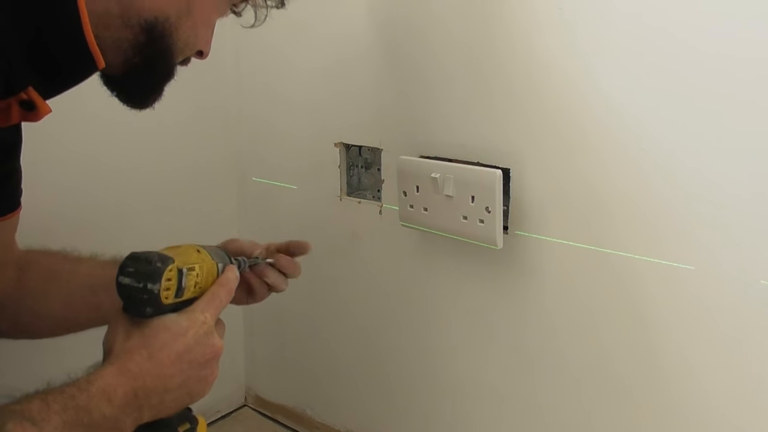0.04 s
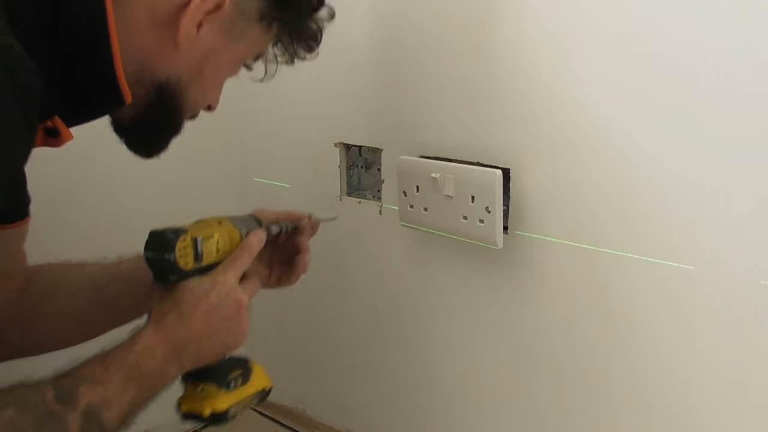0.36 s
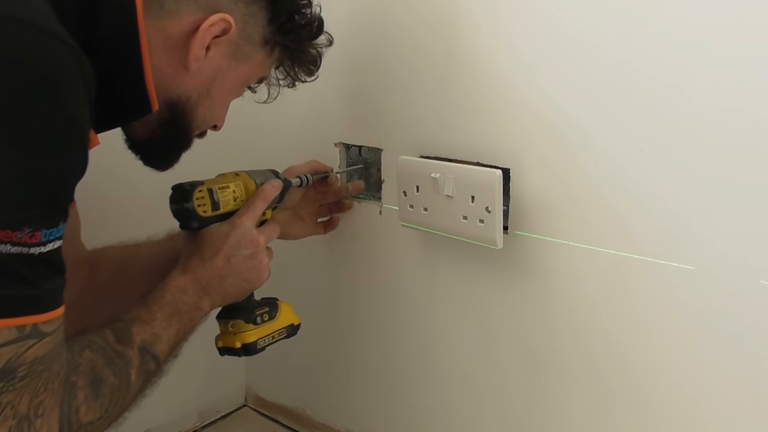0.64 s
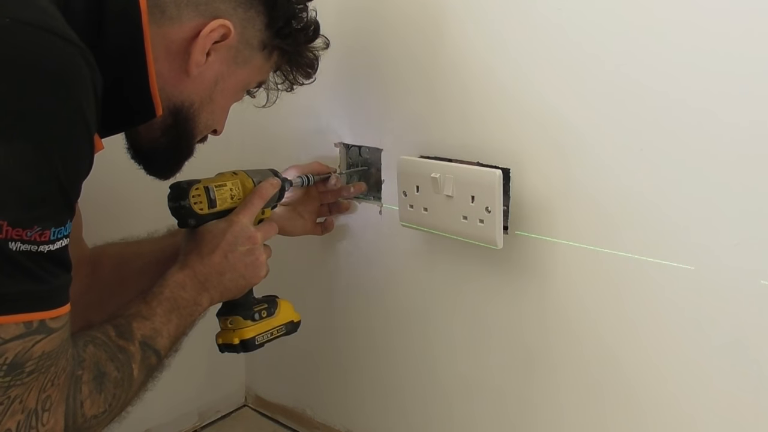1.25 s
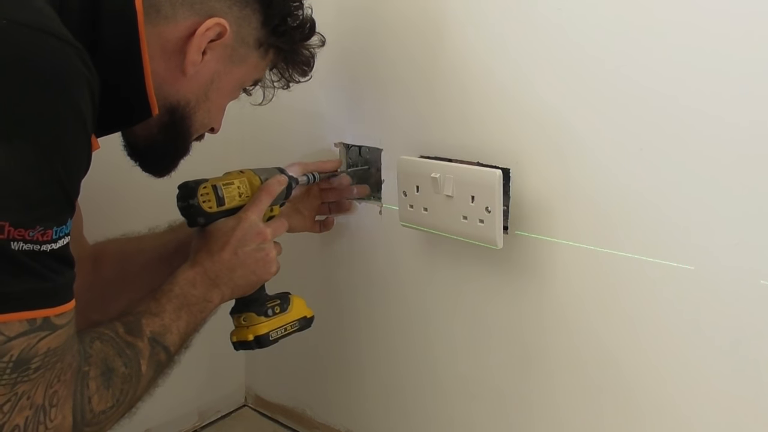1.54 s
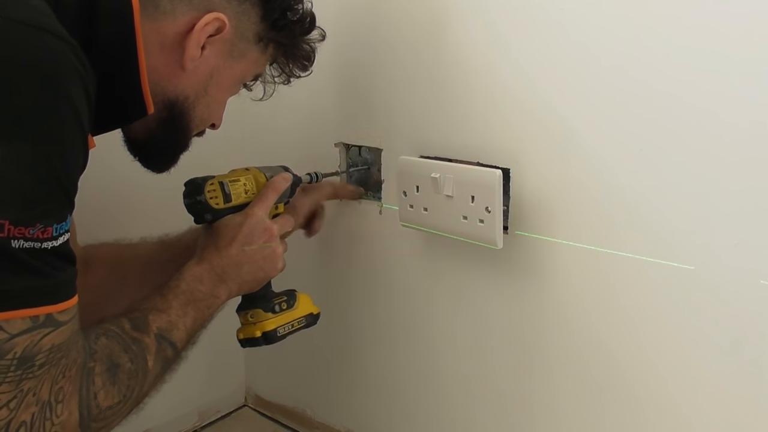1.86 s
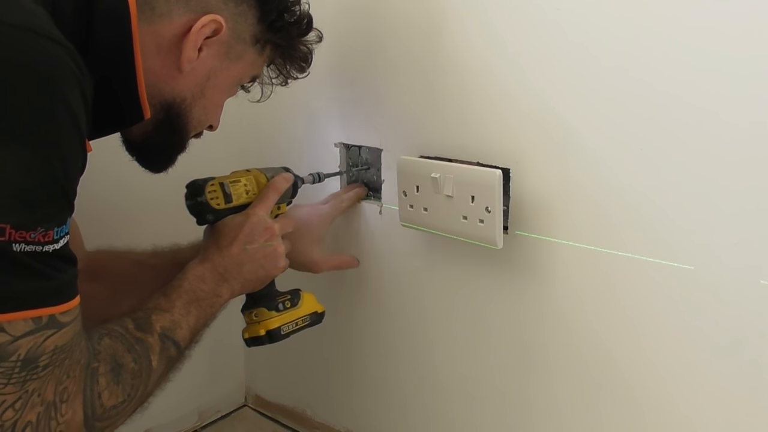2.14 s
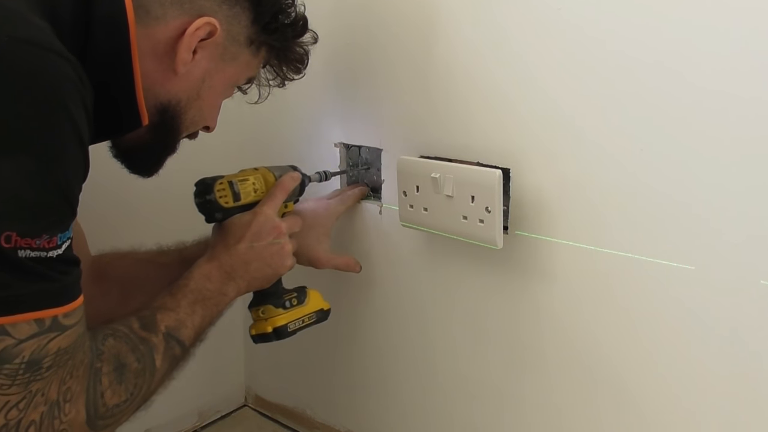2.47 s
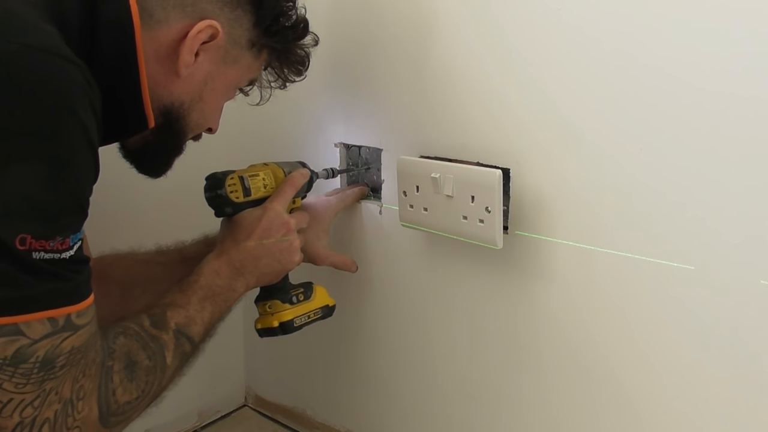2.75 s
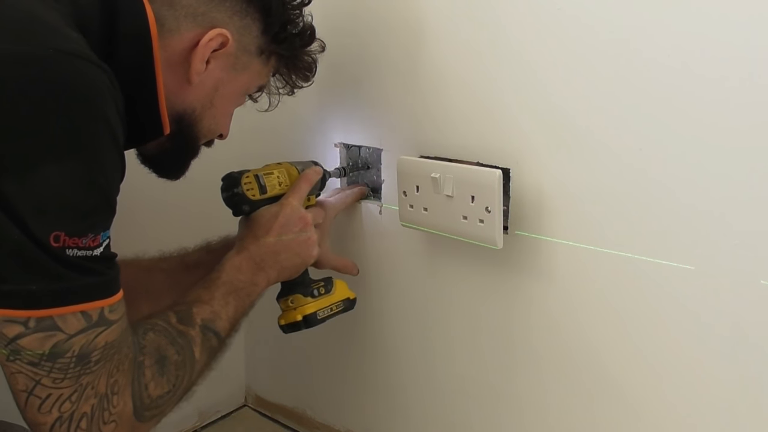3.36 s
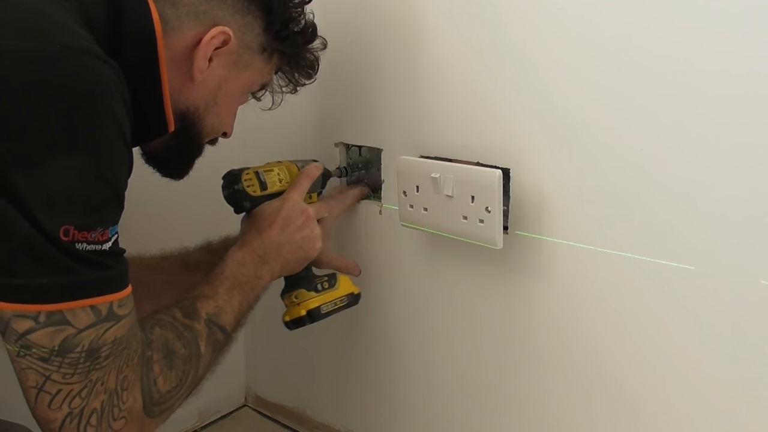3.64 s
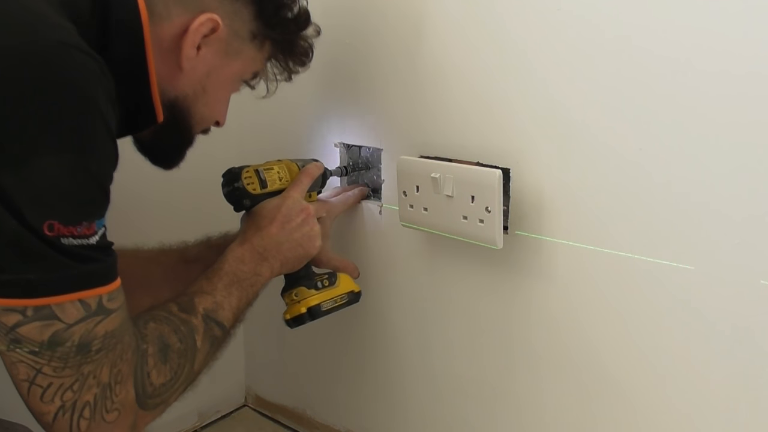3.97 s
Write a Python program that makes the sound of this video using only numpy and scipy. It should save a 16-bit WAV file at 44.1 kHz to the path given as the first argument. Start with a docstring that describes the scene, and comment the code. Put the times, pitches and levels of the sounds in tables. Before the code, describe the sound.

A cordless impact driver works a screw into a metal wall box in a small bare room. Clothes rustle first, the bit clicks and knocks, the motor whines in four short bursts, then rapid hammering follows, pausing briefly once.

```python
"""Clothes rustle first, as a worker in a small bare room leans in with a cordless impact driver.
The bit clicks and knocks in a screw in a metal wall box, and four short trigger pulls spin the
motor up, its harmonics gliding through the resonances of the housing. Then the hammer strikes
the anvil about 41 times a second, pauses and starts again, while the wall drums along in
forced vibration."""
import sys
import numpy as np
from scipy import signal
from scipy.fft import rfft, irfft, next_fast_len
from scipy.io import wavfile
from scipy.ndimage import map_coordinates

SR = 44100
rng = np.random.default_rng(int(sys.argv[2]) if len(sys.argv) > 2 else 0)


def output_pcm(signal):
    """Save a mono or channel-first signal as 16-bit PCM at the path in sys.argv[1].

    Samples are clipped to [-1, 1] before scaling.
    """
    pcm = np.clip(np.atleast_2d(signal).T, -1, 1) * 32767
    wavfile.write(sys.argv[1], SR, np.round(pcm).astype(np.int16))


N = 176400

# Levels are relative; each source applies its own gains.
# friction of sliding clothes: t/s, rub level/dB, hiss level/dB
SLIDE = [(0, -36.5, -43), (.12, -30.5, -38), (.25, -28, -37.5), (.4, -36.5, -36.5), (.55, -35.5, -39),
         (.68, -35.5, -40), (.77, -28, -38.5), (.86, -31, -39), (.95, -38, -48), (1.05, -46, -55),
         (1.25, -66.5, -76)]
# spectra of the rub, the hiss and the room's background: f/Hz, level/dB
RUB_SPECTRUM = [(25, 0), (120, -12), (230, 0), (520, 4), (800, -3), (1050, -3), (1290, 2.5), (1500, -19),
                (3000, -18.5), (8000, -59.5)]
HISS_SPECTRUM = [(300, -36), (1400, -1.5), (1900, -1.5), (2700, -4.5), (3700, 0.5), (5100, -9.5),
                 (7500, -2), (9500, -10.5), (12000, -13), (15500, -26)]
BACKGROUND_SPECTRUM = [(20, -7), (48, 2), (69, 4.5), (120, -5.5), (190, 1), (359, -6.5), (997, -16.5),
                       (1600, -27), (5280, -35), (15500, -25.5)]
# tones of the squealing fabric: f/Hz at t = 0, level/dB
SQUEALS = [(7200, -42.5), (9750, -50)]
# clicks of the loose bit: t/s, level/dB
BIT_CLICKS = [(0.787, -19), (1.392, -20), (1.4, -22)]
# modes of bit and chuck: f/Hz, level/dB, T60/s
BIT_MODES = [(2260, 4.5, 0.021), (3210, -1, 0.024), (7570, 0.5, 0.02)]
# spectrum of metal contact at bit and anvil: f/Hz, level/dB
CONTACT_SPECTRUM = [(40, -28), (120, -11), (1000, -12.5), (1500, -15), (2100, -2), (3000, -3), (4300, 0),
                    (5000, -6), (6300, 0.5), (7600, 3), (9500, 0.5), (13000, -1.5), (15500, -10.5)]
# reverberation time of the room: f/Hz, T60/s
ROOM_DECAY = [(200, 1), (2000, 0.41), (8000, 0.5), (15000, 0.31)]
# bumps of hand and tool on the wall: t/s, level/dB, f/Hz, T60/s
BUMPS = [(1.098, -14.5, 131, 0.061), (1.134, -23, 134, .08), (1.437, -8.5, 223, 0.034),
         (1.658, -12.5, 200, 0.041), (1.764, -15, 200, 0.058), (2.106, -22, 198, .06),
         (2.291, -28.5, 69.5, 0.15), (2.346, -26.5, 63.4, 0.22), (2.385, -21, 99, 0.2),
         (2.585, 0, 242, 0.02), (3.843, -4, 161, 0.033)]
# drumming of the wall under the bit: t/s, level/dB
DRUMMING = [(1.34, -46), (1.39, -26), (1.43, -32.5), (1.53, -31.5), (1.6, -33.5), (1.72, -33), (1.79, -30),
            (1.86, -35), (1.93, -30), (2.02, -35.5), (2.09, -41.5), (2.125, -26), (2.18, -37),
            (2.25, -32.5), (2.36, -25), (2.44, -32), (2.48, -26.5), (2.52, -41), (2.62, -31), (3, -30),
            (3.48, -28), (3.59, -23.5), (3.67, -31), (3.8, -44), (3.82, -41), (3.85, -25), (4, -26.5)]
# whistles of the speed controller: t/s, duration/s, level/dB, second harmonic/dB
WHISTLES = [(1.323, 0.076, -33.5, -6), (1.749, .028, -37, -3), (2.09, 0.031, -39, 4),
            (2.427, 0.019, -40, 5)]
# fundamental of the motor, rising and sagging with each pull: t/s, f/Hz
MOTOR_PITCH = [(1.37, 350), (1.44, 728), (1.462, 758), (1.485, 742), (1.52, 724), (1.54, 700), (1.565, 590),
               (1.59, 490), (1.78, 300), (1.81, 465), (1.83, 562), (1.86, 597), (1.885, 572), (1.92, 430),
               (2.11, 350), (2.15, 640), (2.187, 812), (2.23, 884), (2.247, 875), (2.27, 720), (2.44, 400),
               (2.48, 830), (2.497, 950), (2.515, 1030), (2.53, 1066), (2.56, 1082), (2.595, 1058)]
# strength of gear and fan noise: t/s, level/dB
EFFORT = [(1.32, -62), (1.345, -48), (1.365, -22), (1.398, -31.5), (1.424, -28.5), (1.52, -23.5),
          (1.59, -26), (1.65, -31), (1.735, -38.5), (1.775, -29.5), (1.81, -21.5), (1.85, -28), (1.9, -25),
          (1.934, -30), (2.026, -40.5), (2.095, -41.5), (2.14, -19), (2.164, -23), (2.252, -25), (2.3, -29),
          (2.44, -37.5), (2.465, -18.5), (2.485, -23.5), (2.518, -24.5), (2.585, -19.5), (2.605, -36.5),
          (3.55, -32), (3.6, -31), (3.668, -41.5), (3.8, -48), (3.818, -34), (3.828, -24), (3.86, -25.5),
          (4, -41)]
# trigger pulls in which the motor runs free: start t/s, end t/s, whine level/dB
PULLS = [(1.44, 1.62, -31.5), (1.79, 1.92, -28), (2.13, 2.28, -28.5), (2.455, 2.597, -28)]
# spectra of wall, housing, gears, fan and trigger switch: f/Hz, level/dB
WALL_SPECTRUM = [(25, -35), (60, -20), (110, 0), (200, 0), (320, 3), (430, -7), (620, -1), (800, -8.5),
                 (1200, -8.5), (1500, -17.5), (3000, -20), (8000, -50)]
HOUSING_RESPONSE = [(600, -6), (850, -8.5), (1050, -3.5), (1450, -14), (1750, -8), (2400, -7.5), (3000, -6),
                    (3500, 0), (3850, 2.5), (4300, -4.5), (4800, -11), (5300, -9), (6000, -13), (7400, -10),
                    (10000, -14), (15000, -21)]
GEAR_SPECTRUM = [(100, -48), (700, 2), (1500, -6.5), (2400, -0.5), (2900, -4.5), (3500, -0.5), (4100, 2),
                 (4900, -6.5), (6200, -4.5), (7700, -5), (10000, -17.5), (12500, -12), (15500, -39)]
FAN_SPECTRUM = [(3000, -22), (7000, -4), (12500, -0.5), (15500, -8)]
TICK_SPECTRUM = [(2000, -11), (6000, -7), (8500, 2), (15000, -20)]
# resonances of metal parts shaken by the gears: f/Hz, bandwidth/Hz, level/dB
METAL_RESONANCES = [(3415, 340, 1.5), (3820, 180, -2)]
# jolts of the bit in the screw head: t/s, level/dB
JOLTS = [(1.3744, -0.5), (1.3812, -1), (2.596, 2.5)]
# spectrum of a jolt's crack: f/Hz, level/dB
CRACK_SPECTRUM = [(200, 7.5), (900, -2.0), (1500, -3.5), (3000, -7.5), (8000, -7.5), (15000, -14)]
# ticks of the trigger switch: t/s, level/dB
TICKS = [(1.763, -22.5), (2.105, -21.5), (2.392, -32)]
# hammer blows on the anvil: t/s, level/dB
BLOWS = [(2.619, -10.5), (2.6425, -9.5), (2.666, -13), (2.6908, -9.5), (2.7145, -13.5), (2.7382, -9.5),
         (2.7631, -12), (2.7877, -10), (2.8112, -12), (2.8355, -11), (2.8594, -13), (2.882, -10),
         (2.907, -13), (2.932, -9.5), (2.9647, -15), (2.9879, -12.5), (3.0111, -12.5), (3.036, -9.5),
         (3.0599, -13.5), (3.0842, -10.5), (3.1094, -11.5), (3.1308, -9), (3.1547, -16), (3.1792, -9),
         (3.2041, -15), (3.2278, -11), (3.2525, -10.5), (3.2757, -10.5), (3.3014, -11), (3.3262, -11),
         (3.3498, -10), (3.373, -10), (3.3987, -11), (3.4228, -11), (3.446, -11.5), (3.4695, -11),
         (3.4932, -12), (3.5194, -10), (3.5473, -11), (3.5797, -15.5), (3.5961, -15), (3.8244, -15.5),
         (3.8501, -6.5), (3.8715, -9), (3.8945, -12), (3.9133, -10.5), (3.934, -12), (3.958, -10),
         (3.985, -14)]
# modes of the anvil: f/Hz, level/dB, T60/s
ANVIL_MODES = [(2047, -3.5, 0.025), (2540, -6, 0.018), (4420, -3, 0.016), (7740, 0, 0.019)]
# coherence of left and right: f/Hz, correlation (capped at 1 in use)
COHERENCE = [(60, 0.8), (250, 0.81), (1000, 0.65), (2000, 0.76), (2900, 0.9), (6500, 1.64), (8000, 0.88),
             (13000, 0.26)]
# imbalance of the microphones: f/Hz, left-minus-right level/dB
IMBALANCE = [(60, -2), (120, -5), (240, -2.0), (480, -0.5), (950, 3.5), (1890, 2), (3770, 1.5),
             (7520, -0.5), (15000, -2.0)]


def amp(db):
    """Amplitude grows tenfold for every 20 dB."""
    return 10 ** (np.asarray(db) / 20)


def unit(x):
    """Normalisation to an rms of 1."""
    return x / np.sqrt(np.mean(x ** 2) + 1e-20)


def along(points, hz):
    """Interpolation of (f/Hz, value) points on a logarithmic frequency axis."""
    f, values = np.transpose(points)
    return np.interp(np.log(hz + 1), np.log(f + 1), values)


def curves(rows):
    """Linear interpolation in time: one value per sample for each column after t/s."""
    times, *columns = np.transpose(rows)
    return [np.interp(np.arange(N) / SR, times, column) for column in columns]


def wobble(rate):
    """Smooth random modulation: a spline through `rate` Gaussian knots a second."""
    at = np.arange(int(N * rate / SR + 2) * 8) / 8
    knots = rng.standard_normal(int(at[-1]) + 2)
    return np.interp(np.arange(N) * rate / SR, at, map_coordinates(knots, [at]))


def filtered(x, response):
    """Linear filtering multiplies the spectrum by a frequency response."""
    size = next_fast_len(N + SR // 2)
    return irfft(rfft(x, size) * response(np.fft.rfftfreq(size, 1 / SR)), size)[..., :N]


def spread(pair):
    """Partial coherence: two independent signals, weighted as mid and side, give left and right."""
    angle = lambda hz: np.arccos(np.clip(along(COHERENCE, hz), -1, 1)) / 2
    mid, side = filtered(pair, lambda hz: np.array([np.cos(angle(hz)), np.sin(angle(hz))]))
    return np.array([mid + side, mid - side])


def noise(spectrum):
    """Spectral shaping of white noise, in stereo, with an rms of 1."""
    white = rng.standard_normal((2, N))
    return unit(spread(filtered(white, lambda hz: amp(along(spectrum, hz)))))


def add(track, start, sound):
    """Superposition of a sound on the track from `start` seconds."""
    part = track[round(start * SR):][:len(sound)]
    part += sound[:len(part)]


def bursts(rows, attack_s, hold_s, t60_s):
    """Transient envelopes: each (t/s, level/dB) row rises linearly and decays exponentially."""
    track, t = np.zeros(N), np.arange(SR // 10) / SR
    shape = np.minimum(t / attack_s, 1) * amp(-60 * np.maximum(t - hold_s, 0) / t60_s)
    for start, db in rows:
        add(track, start, amp(db) * shape)
    return track


def struck(rows, modes):
    """Free vibration: each impact excites damped modes, scattered a little in level and frequency."""
    track, t = np.zeros(N), np.arange(SR // 10) / SR
    for start, db in rows:
        for hz, mode_db, t60 in modes:
            decay = amp(db + mode_db + rng.normal(0, 3.2) - 60 * t / t60)
            detuned_hz = hz * (1 + rng.normal(0, .012))
            add(track, start, decay * np.sin(2 * np.pi * detuned_hz * t))
    return track


def clothes():
    """Sliding friction of fabric gives broadband noise: a hollow rub and a grainy hiss."""
    rub_db, hiss_db = curves(SLIDE)
    rub = amp(rub_db + 1.1 * wobble(45.2)) * noise(RUB_SPECTRUM)
    hiss = amp(hiss_db + .49 * wobble(200)) * noise(HISS_SPECTRUM)
    return rub + hiss


def background():
    """Stationary noise, strongest in the bass, is the room's noise floor."""
    return amp(-45) * noise(BACKGROUND_SPECTRUM)


def squeal(rise_per_s=.2, jitter=.024):
    """Friction of the fabric sounds thin rising tones, roughened by random frequency modulation."""
    t, gate, tones = np.arange(N) / SR, np.zeros(N), np.zeros(N)
    add(gate, start=.11, sound=signal.windows.tukey(int(.43 * SR), .5))
    for hz, db in SQUEALS:
        gain = amp(db + 2 * wobble(60.7))
        pitch = hz * (1 + rise_per_s * t + jitter * wobble(500))
        tones += gain * np.sin(2 * np.pi * np.cumsum(pitch) / SR)
    return gate * tones


def bit():
    """Impacts of the loose bit give contact noise and excite the modes of bit and chuck."""
    rattle = bursts(BIT_CLICKS, attack_s=.0014, hold_s=.002, t60_s=.025) * noise(CONTACT_SPECTRUM)
    return rattle + amp(-2.5) * struck(BIT_CLICKS, BIT_MODES)


def reverberation(x):
    """Reflections from bare plaster form a diffuse tail whose decay time depends on frequency."""
    hz, t, spectra = signal.stft(rng.standard_normal((2, SR // 2)), SR, nperseg=256)
    decay = amp(-60 * t / along(ROOM_DECAY, hz)[:, None])
    _, tail = signal.istft(spectra * decay, SR, nperseg=256)
    tail /= np.linalg.norm(tail[0])
    return spread(signal.fftconvolve(x.mean(axis=0)[None], tail, axes=1)[:, :N])


def wall(attack_s=.0031):
    """The wall thuds in damped free vibration when bumped and drums in forced vibration under the bit."""
    thuds, t = np.zeros(N), np.arange(SR // 3) / SR
    onset = 1 - np.exp(-t / attack_s)
    for start, db, hz, t60 in BUMPS:
        add(thuds, start, amp(db - 60 * t / t60) * onset * np.sin(2 * np.pi * hz * t))
    drum_db, = curves(DRUMMING)
    return thuds + amp(drum_db + 1.4 * wobble(60)) * noise(WALL_SPECTRUM)


def controller(switching_hz=3950):
    """Periodic switching in the speed controller whistles in three harmonics as each pull begins."""
    track = np.zeros(N)
    for start, duration, db, second_db in WHISTLES:
        phase = 2 * np.pi * switching_hz * np.arange(int(duration * SR)) / SR
        tone = np.sin(phase) + amp(second_db) * np.sin(2 * phase) + amp(-10) * np.sin(3 * phase)
        add(track, start, amp(db) * signal.windows.tukey(len(phase), .2) * tone)
    return track


def motor(jitter=.00435, fade_s=.017):
    """Rotation drives gears, fan and whine; in free running the gears ease and the fan grows louder."""
    t = np.arange(N) / SR
    pitch, = curves(MOTOR_PITCH)
    effort_db, = curves(EFFORT)
    phase = 2 * np.pi * np.cumsum(pitch * (1 + jitter * wobble(150))) / SR
    whine_gain, free_running = np.zeros(N), np.zeros(N)
    for start, end, db in PULLS:
        gate = np.clip(np.minimum(t - start, end - t) / fade_s, 0, 1)
        whine_gain += amp(db) * gate
        free_running += gate
    tone = whine_gain * whine(pitch, phase)
    rattle = gears(effort_db, phase)
    air = amp(4 * free_running) * fan(effort_db)
    return tone + amp(-2 * free_running) * rattle + ringing(rattle) + air


def gears(effort_db, phase, depth=.51):
    """Gear rattle is noise, amplitude-modulated at the motor's fundamental."""
    gain = amp(effort_db - 4.5 + .9 * wobble(300))
    return gain * noise(GEAR_SPECTRUM) * (1 + depth * np.cos(phase))


def fan(effort_db, full_db=-21, exponent=1.44):
    """Bright airflow noise follows a power law, growing faster with effort than the gear rattle."""
    return amp(full_db - 10 + exponent * (effort_db - full_db)) * noise(FAN_SPECTRUM)


def ringing(rattle, t60_s=.87):
    """Resonance: shaken metal parts sing on in two narrow bands."""
    t = np.arange(N) / SR
    bands = lambda f: sum(amp(db) / (1 + ((f - hz) / width * 2) ** 2)
                          for hz, width, db in METAL_RESONANCES)
    tail = filtered(rng.standard_normal(N), bands) * amp(-60 * t / t60_s)
    return amp(-16) * signal.fftconvolve(rattle.mean(axis=0), tail / np.linalg.norm(tail))[:N]


def whine(pitch, phase, mesh_order=4, full_pitch_hz=720, full_load_hz_per_s=4000):
    """Source and filter: partials sweep the housing's resonances; acceleration lifts the gear mesh tone."""
    load = np.clip(np.gradient(pitch) * SR / full_load_hz_per_s, 0, 1)
    harmonics = [(order, 3 + 5 * load if order == mesh_order else 0) for order in range(1, 17)]
    half_orders = [(order + .5, -9) for order in range(8)]
    tone = np.zeros(N)
    for order, db in harmonics + half_orders:
        gain = amp(db + along(HOUSING_RESPONSE, order * pitch) + 3 * wobble(70))
        blur_rad = .6 * wobble(160)
        tone += gain * np.sin(order * phase + blur_rad + rng.uniform(0, 2 * np.pi))
    return np.minimum(pitch / full_pitch_hz, 1) * tone


def jolts(push_s=.00029):
    """Impulsive force: the bit jolts in the screw head, giving a push, a rebound and a crack."""
    pulses, scaled_t = np.zeros(N), np.arange(SR // 50) / SR / push_s
    push_and_rebound = 3.23 * scaled_t * (1 - scaled_t / 2) * np.exp(-scaled_t)
    for start, db in JOLTS:
        add(pulses, start, amp(db) * push_and_rebound)
    crack = bursts(JOLTS, attack_s=.00022, hold_s=.00055, t60_s=.016) * noise(CRACK_SPECTRUM)
    return pulses + amp(-9) * crack


def trigger():
    """A brief contact has a broad spectrum: the switch ticks brightly."""
    return bursts(TICKS, attack_s=.00071, hold_s=.002, t60_s=.025) * noise(TICK_SPECTRUM)


def hammer():
    """Impact excitation: each blow snaps, chatters for a few milliseconds and rings the anvil's modes."""
    snap = amp(-12) * bursts(BLOWS, attack_s=.00031, hold_s=.00031, t60_s=.0026)
    chatter = amp(-8) * bursts(BLOWS, attack_s=.0013, hold_s=.0027, t60_s=.016)
    return (snap + chatter) * noise(CONTACT_SPECTRUM) + amp(-16) * struck(BLOWS, ANVIL_MODES)


def scene():
    """Superposition of the direct sounds and the reverberant field of the tool."""
    drive = motor() + controller()
    blows = hammer()
    clicks = bit() + trigger()
    echo = reverberation(amp(-4) * blows + amp(-12) * clicks + amp(-12.5) * drive)
    return drive + blows + clicks + echo + jolts() + wall() + clothes() + squeal() + background()


def record(dry, ceiling=.95, cutoff_hz=15700):
    """Two microphones differ in response; soft saturation rounds the peaks and a low-pass follows."""
    x = filtered(dry, lambda hz: amp(along(IMBALANCE, hz) * np.array([[.5], [-.5]])))
    x = x / (1 + (x / ceiling) ** 6) ** (1 / 6)
    return filtered(x, lambda hz: hz < cutoff_hz)


dry = scene()
out = record(dry)
output_pcm(out)
```